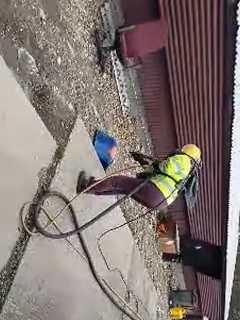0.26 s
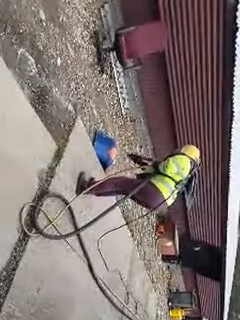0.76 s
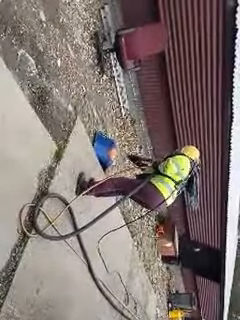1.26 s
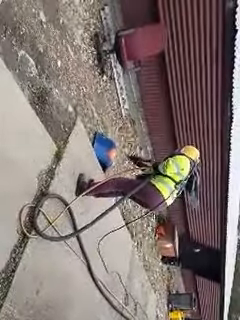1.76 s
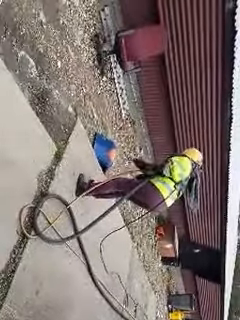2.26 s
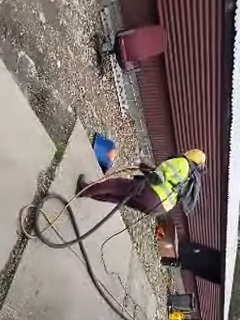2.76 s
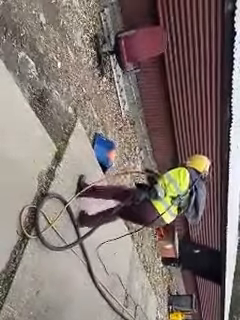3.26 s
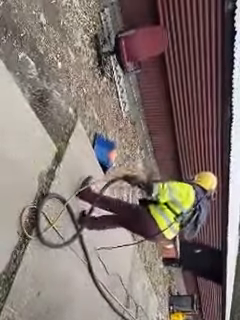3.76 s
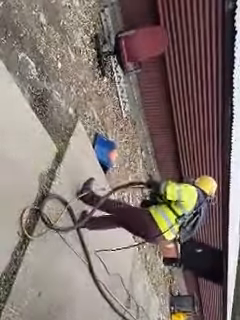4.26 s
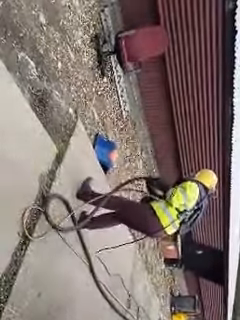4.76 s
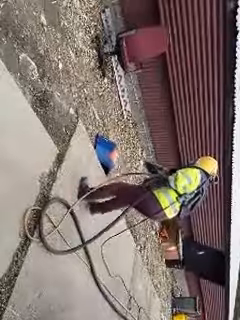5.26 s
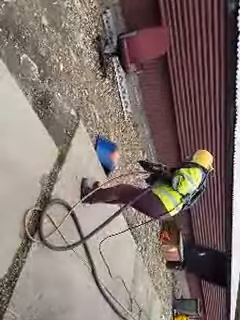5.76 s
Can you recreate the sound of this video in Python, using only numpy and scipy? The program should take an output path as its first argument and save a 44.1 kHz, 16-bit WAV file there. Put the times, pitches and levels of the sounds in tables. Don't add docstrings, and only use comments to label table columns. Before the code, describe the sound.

High-pressure grit and water jet roars and fizzes steadily with a faint screech, stops for under half a second, then returns at full force.

```python
import sys
import numpy as np
from scipy import signal
from scipy.fft import rfft, irfft, next_fast_len
from scipy.io import wavfile
from scipy.ndimage import uniform_filter1d, map_coordinates

SR = 44100
rng = np.random.default_rng(int(sys.argv[2]) if len(sys.argv) > 2 else 0)


def transcribe(u):
    v = np.clip(np.atleast_2d(u).T, -1, 1)
    q = np.round(v * 32767).astype(np.int16)
    wavfile.write(sys.argv[1], SR, q)


def nominal_scale(level):
    x = np.asarray(level, float) / 20
    return 10 ** x


N = 265923


def unit(x):
    return x / np.sqrt(np.mean(x ** 2) + 1e-20)


def along(points, hz):
    f, v = np.transpose(points)
    return np.interp(np.log(hz + 1), np.log(f + 1), v)


def curves(rows):
    s, *cols = np.transpose(rows)
    return [np.interp(np.arange(N) / SR, s, c) for c in cols]


def wobble(rate):
    knots = rng.standard_normal(100 * (N // SR + 2))
    return map_coordinates(knots, [np.arange(N) * rate / SR])


def filtered(x, response):
    m = next_fast_len(N + 8192)
    spectrum = rfft(x, m) * response(np.fft.rfftfreq(m, 1 / SR))
    return irfft(spectrum, m)[..., :N]


def sides(pan_db):
    return nominal_scale(np.array([pan_db / 2, -pan_db / 2]))


def patches(shape, bins, frames):
    field = uniform_filter1d(rng.standard_normal(shape), size=bins, axis=-2)
    for _ in range(2):
        field = uniform_filter1d(field, size=frames, axis=-1)
    return unit(field)


# [f/Hz, left minus right level/dB]
BODY_SHADE = [(200, -2), (490, -8), (750, 2), (1150, -4.5), (1740, 1.5), (2660, 3), (4050, -1.5), (4900, 0),
              (5800, 1), (6500, 0), (7300, -9), (8600, -8.5), (11000, -7.5), (14300, -8.5)]


def rush(spectrum, alike, ripple_db, patchy_db, shade=1):
    a, b = signal.stft(rng.standard_normal((2, N)), nperseg=1024)[2]
    hz = np.linspace(0, SR / 2, len(a))[:, None]
    turn = np.arccos(np.clip(along(alike, hz), -1, 1)) / 2
    z = np.array([np.cos(turn) * a + np.sin(turn) * b, np.cos(turn) * a - np.sin(turn) * b])
    z[0] *= np.exp(-2j * np.pi * hz * 1.38 / SR)
    z = z * nominal_scale(along(spectrum, hz)) * sides(shade * along(BODY_SHADE, hz))
    ripples = ripple_db * patches(z.shape, bins=2, frames=40)
    eddies = patchy_db * patches(z.shape, bins=16, frames=5)
    return unit(signal.istft(z * nominal_scale(ripples + eddies), nperseg=1024)[1][:, :N])


SHUT_S, SNAP_DB_PER_S = 4.606, 248
BLEED_FROM_DB, BLEED_DB_PER_S = -8, 151
OPEN_S, RISE_DB_PER_S = 4.985, 478


def valve():
    t = np.arange(N) / SR
    since = np.maximum(t - SHUT_S, 0)
    fall = np.maximum(-SNAP_DB_PER_S * since, BLEED_FROM_DB - BLEED_DB_PER_S * since)
    rise = np.minimum(RISE_DB_PER_S * (t - OPEN_S), 0)
    return fall, rise


def flow(shut, opening):
    fall, rise = valve()
    leak_db = -43
    return nominal_scale(np.maximum(np.maximum(shut * fall, opening * rise), leak_db))


# [f/Hz, likeness from -1 to 1]
JET_ALIKE = [(500, 0.33), (1400, 0.33), (3000, 0.14), (6500, 0.35), (14000, 0.09)]
# [f/Hz, level/dB per Hz]
ROAR_TONE = [(260, -49), (450, -25), (713, -14.5), (921, -14.5), (1110, -15.5), (1280, -9.5), (1590, -11.5),
             (1870, -7.5), (2030, -6), (2200, -6.5), (2360, -7.5), (4320, -5.5), (5200, -1), (6760, -63),
             (11400, -120)]


def roar(surge):
    level_db = -5 + 0.47 * surge + 0.49 * wobble(3.1)
    noise = rush(ROAR_TONE, JET_ALIKE, ripple_db=3.0, patchy_db=1.27)
    return flow(0.86, 0.86) * nominal_scale(level_db) * noise


# [f/Hz, level/dB per Hz]
CORE_TONE = [(2350, -22.5), (4000, -14.5), (4610, -13.5), (5710, 1), (6860, -2), (9000, -12),
             (11700, -24.5), (19800, -120)]
# [f/Hz, width/Hz, level/dB against the core]
SCREECHES = [(5540, 65, -15), (5950, 50, -18), (6420, 50, -19), (1922, 35, -28)]


def core_with_screech():
    core = rush(CORE_TONE, JET_ALIKE, ripple_db=2.08, patchy_db=.5)
    for hz, width, db in SCREECHES:
        tone = filtered(rng.standard_normal(N), lambda f: np.exp(-((f - hz) / width) ** 2))
        waver_db = 5.4 * np.array([wobble(2.6), wobble(2.84)])
        core = core + nominal_scale(db + waver_db) * unit(tone)
    return flow(0.91, 0.98) * core


# [f/Hz, level/dB per Hz]
FIZZ_TONE = [(4410, -36.5), (7500, -9), (8870, -4.5), (10100, -3), (11000, -5.5), (14300, -7.5)]


def fizz(surge):
    level_db = -3.5 + 1.0 * surge + 0.43 * wobble(16) + .5 * wobble(3.3)
    noise = rush(FIZZ_TONE, JET_ALIKE, ripple_db=-3.0, patchy_db=0.73)
    return flow(1.06, 0.92) * nominal_scale(level_db) * noise


# [t/s, core level/dB]
PRESSURE_OVER_TIME = [(0, -11), (.3, -11), (.65, -10), (1.75, -9.5), (2.8, -12), (3.0, -12), (4.3, -12.5),
                      (4.6, -13.5), (5.0, -11), (5.5, -12), (6.03, -10.5)]


def jet():
    core_db, = curves(PRESSURE_OVER_TIME)
    surge = wobble(7)
    blast = core_with_screech() + roar(surge) + fizz(surge)
    swing_db = .5 * wobble(2.5)
    drift_db = -0.12 * (np.arange(N) - N / 2) / SR
    return nominal_scale(core_db + 3.5 + 0.34 * surge) * sides(swing_db + drift_db) * blast


# [t/s, left rumble level/dB, right rumble level/dB]
OVERDRIVE = [(0, -33, -19.5), (.8, -32.5, -19), (1.7, -39.5, -19.5), (2.3, -36, -25), (2.9, -33, -32),
             (3.6, -39, -36.5), (4.2, -52, -43), (4.6, -50, -59.5), (5.1, -38, -29), (5.5, -41.5, -30),
             (6.03, -30, -29)]
# [f/Hz, level/dB]
LEFT_RUMBLE_TONE = [(25, -33), (90, -9), (150, -8), (230, 4), (320, -1.5), (450, -13), (900, -24),
                    (3000, -60)]
RIGHT_RUMBLE_TONE = [(15, -48), (25, -18), (113, 3), (173, 2), (430, -4), (694, -6), (882, -12.5),
                     (1500, -26.5), (1950, -108), (3300, -120)]


def overload_rumble():
    blowing = nominal_scale(np.maximum(*valve()))
    level = nominal_scale(curves(OVERDRIVE))
    chance, size = rng.random((2, N)), rng.standard_normal((2, N))
    rate = np.array([899.5 + 0 * level[0], 95.0 + 6500 * level[1]])
    uneven = nominal_scale(2.5 * rng.standard_normal((2, N)))
    slips = (chance < rate / SR) * size * uneven / np.sqrt(rate)
    tone = lambda f: nominal_scale([along(LEFT_RUMBLE_TONE, f), along(RIGHT_RUMBLE_TONE, f)])
    left, right = filtered(slips, tone)
    bouts = nominal_scale(2 * np.array([wobble(12), wobble(16)]))
    return level * bouts * blowing * [unit(left), unit(right)]


# [t/s, signed peak pressure]
RIGHT_POPS = [(2.346, 0.2), (2.41, -0.15), (2.562, 0.28), (2.626, 0.11), (2.814, -0.19), (2.867, -0.23),
              (3.101, 0.24), (3.164, -0.12), (3.573, 0.14), (3.603, 0.11), (3.661, 0.13), (4.077, 0.22),
              (4.282, 0.23), (5.071, 0.13), (5.175, -0.18), (5.221, 0.16), (5.388, -0.14), (5.473, 0.32),
              (5.55, -0.13), (5.603, 0.2), (5.684, 0.2), (5.8, 0.15), (5.881, 0.2), (5.987, -0.15)]


def overload_pops():
    kicks = np.zeros((2, N))
    for s, push in RIGHT_POPS:
        kicks[1, round((s - .001) * SR)] = 80 * push

    def thump(f):
        ring = 1j * f * 300 / (115 ** 2 - f * f + 1j * f * 300)
        return ring / (1 + 1j * f / 480)
    return filtered(kicks, thump)


# [f/Hz, level/dB rms]
ENGINE_HUMS = [(80.7, -50), (161.5, -47), (202.5, -64), (242.2, -63), (323.5, -65), (484.5, -65)]


def compressor():
    t = np.arange(N) / SR
    drone = np.zeros(N)
    for hz, db in ENGINE_HUMS:
        drone = drone + nominal_scale(db + 3 + .8 * wobble(12)) * np.sin(2 * np.pi * (hz * t + rng.random()))
    return drone


# [f/Hz, level/dB per Hz]
YARD_TONE = [(30, -23), (120, 1.5), (220, -1.5), (340, -8.5), (420, -15), (640, -4.5), (1600, -9.5),
             (6100, -31), (9000, -28), (12000, -27), (16000, -33)]
# [f/Hz, likeness from -1 to 1]
YARD_LIKENESS = [(60, 0.64), (240, 0.93), (930, 0.42), (3650, -0.11), (14300, -0.04)]


def yard():
    return nominal_scale(-48.5) * rush(YARD_TONE, YARD_LIKENESS, ripple_db=-3, patchy_db=1.0, shade=1.1)


# [t/s, peak level/dB, f/Hz, length/s]
WATER_SPITS = [
    (4.726, -28, 7400, .005),
    (4.88, -44, 6500, .005),
    (4.96, -11, 12000, .008),
]


def spits():
    t, out = np.arange(N) / SR, np.zeros(N)
    for s, db, hz, length in WATER_SPITS:
        puff = filtered(rng.standard_normal(N), lambda f: np.exp(-((f - hz) / (0.48 * hz)) ** 2))
        out = out + nominal_scale(db) * np.exp(-((t - s) / length) ** 2) * unit(puff)
    return nominal_scale([[-7], [0]]) * out


def scene():
    return jet() + overload_rumble() + overload_pops() + compressor() + yard() + spits()


# [f/Hz, level/dB per bin]
DROWNED_LIMIT = [(40, -33.5), (90, -41), (150, -39.5), (300, -40), (500, -39.5), (900, -39.5),
                 (1600, -38.5), (3000, -43), (6000, -31.5), (9000, -37), (14500, -43)]
# [f/Hz, level/dB per bin]
HEARING_LIMIT = [(100, -110), (6000, -100), (9500, -88), (11000, -87), (14500, -81)]


def thinned(x, scatter_db):
    top_hz, shift = 14470, 389
    frames = dict(window="cosine", nperseg=2048, noverlap=1024)
    hz, _, z = signal.stft(np.pad(x, ((0, 0), (shift, 0))), SR, **frames)
    band = np.round(np.where(hz < 1720, hz / 86, hz / 43 - 20)).astype(int)
    member = band == np.arange(band.max() + 1)[:, None]
    power = 1.6 * np.abs(z) ** 2
    drowned = nominal_scale(2 * along(DROWNED_LIMIT, hz))[:, None] * power.sum(axis=1, keepdims=True)
    limit = drowned + nominal_scale(2 * along(HEARING_LIMIT, hz))[:, None]
    over = member @ power / (member @ limit)
    kept = over * nominal_scale(2 * scatter_db * rng.standard_normal(over.shape)) > 1
    z = z * kept[:, band] * (hz < top_hz)[:, None]
    return signal.istft(z, SR, **frames)[1][:, shift:shift + N]


def band_limit(x):
    return signal.sosfilt(signal.butter(12, 14940, fs=SR, output="sos"), x)


def record(dry):
    top = 0.99
    clipped = dry / (1 + np.abs(dry / top) ** 6) ** (1 / 6)
    mix = thinned(clipped, scatter_db=1)
    return band_limit(mix)


dry = scene()
out = record(dry)
transcribe(out)
```